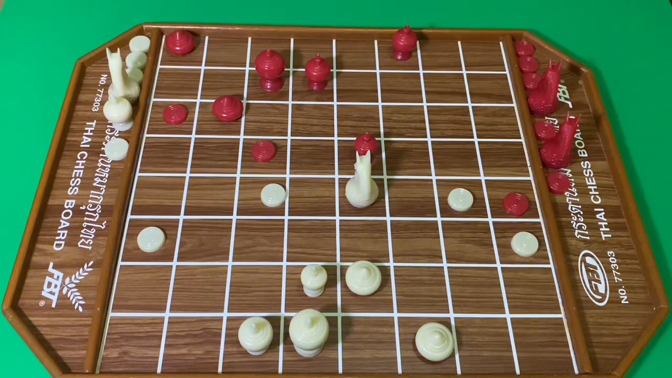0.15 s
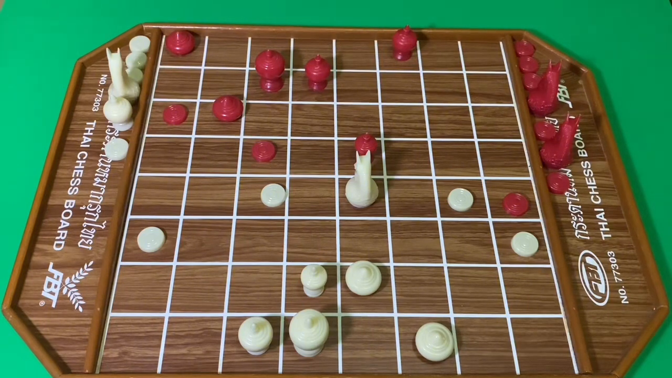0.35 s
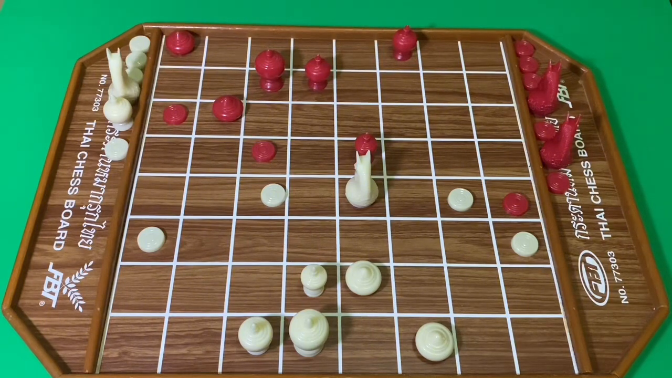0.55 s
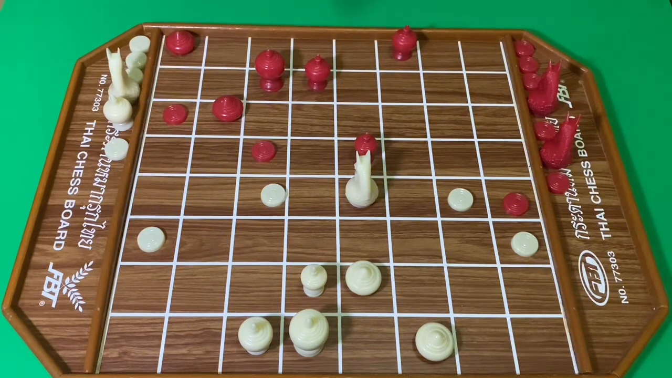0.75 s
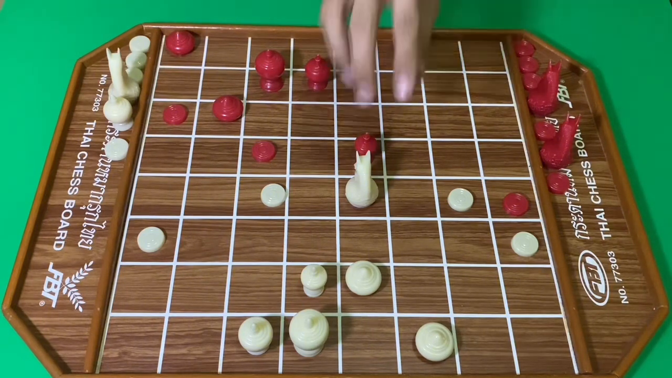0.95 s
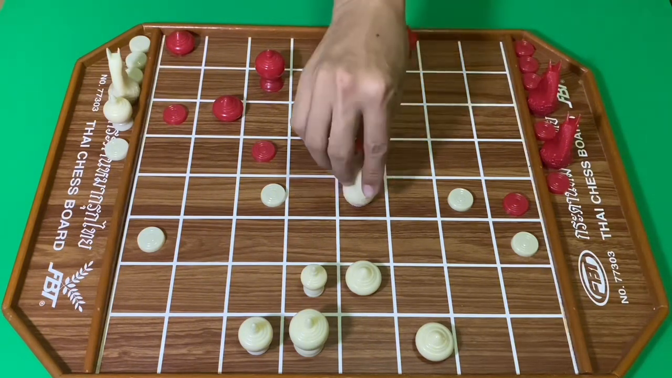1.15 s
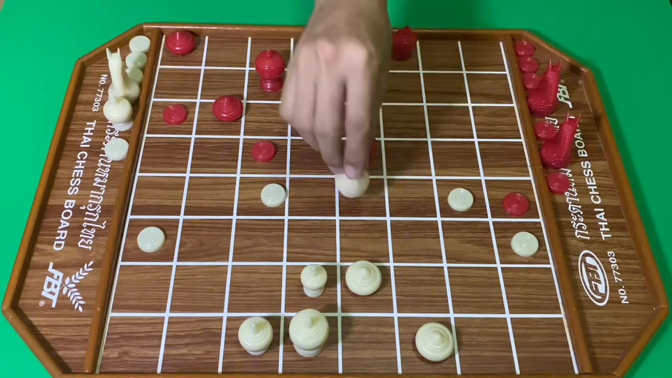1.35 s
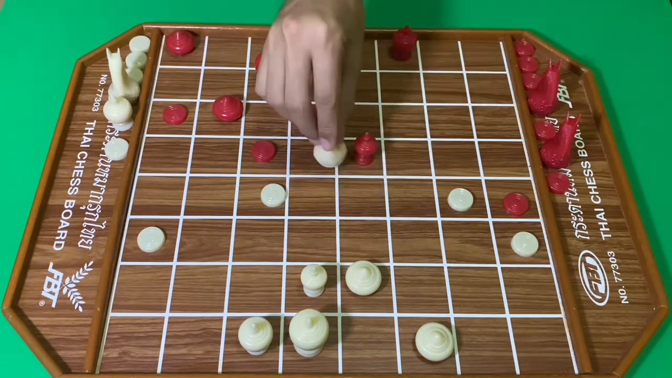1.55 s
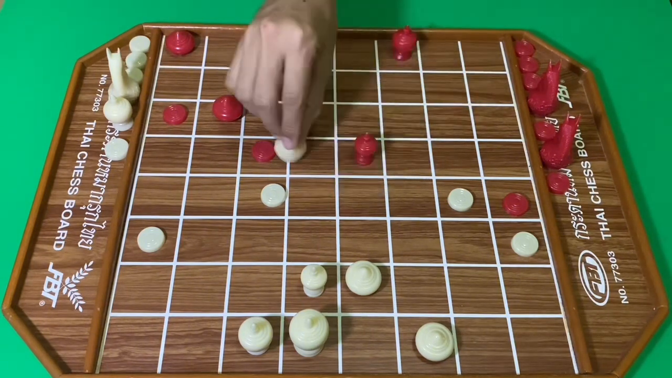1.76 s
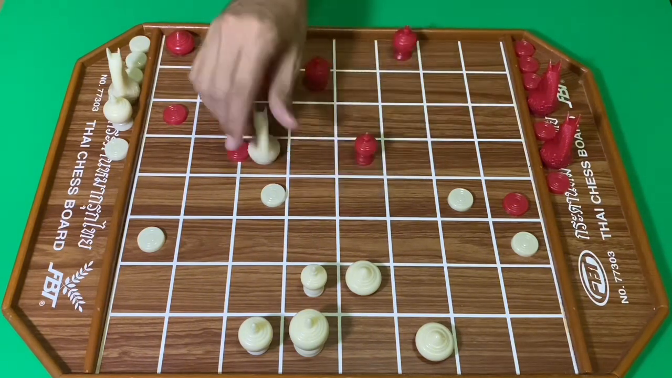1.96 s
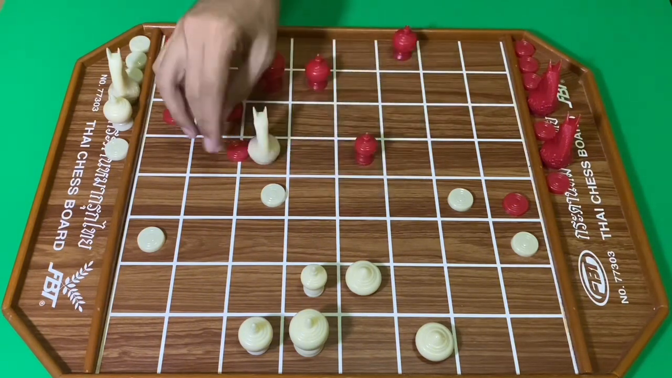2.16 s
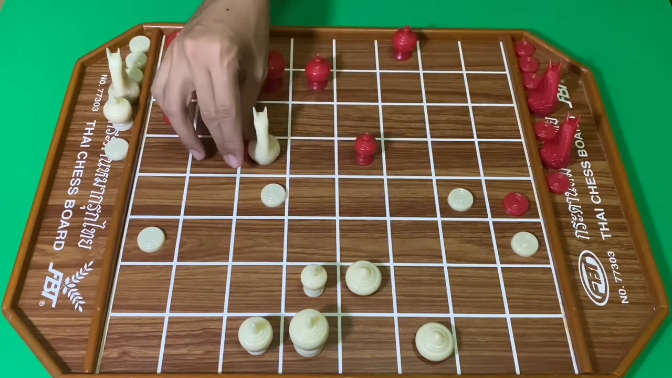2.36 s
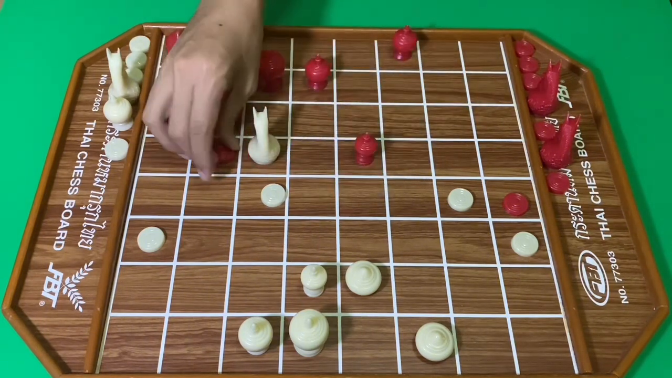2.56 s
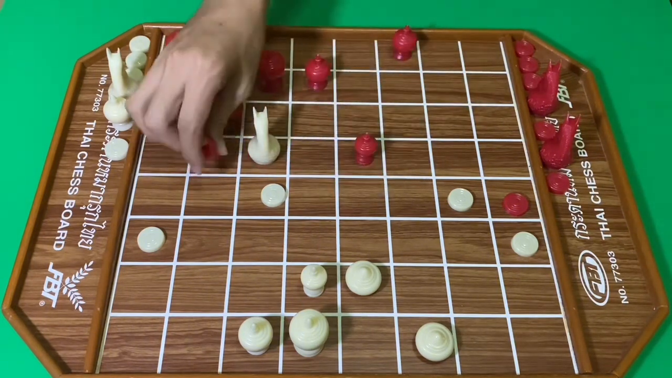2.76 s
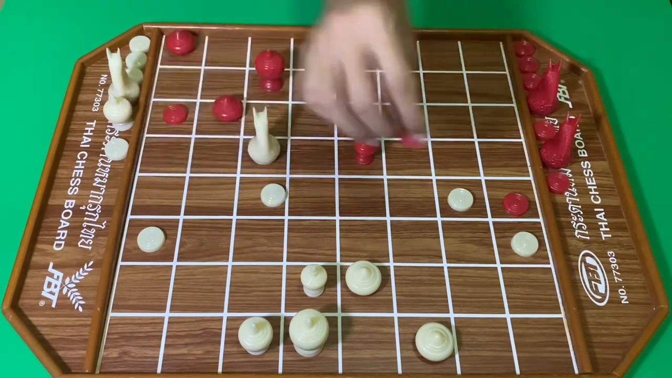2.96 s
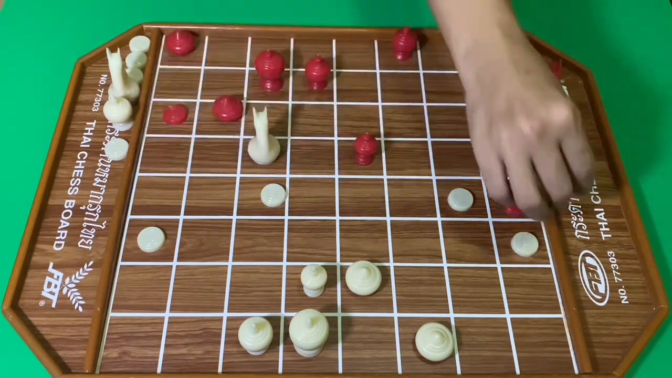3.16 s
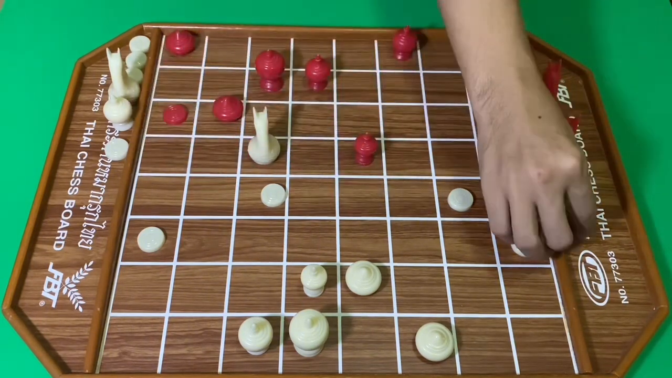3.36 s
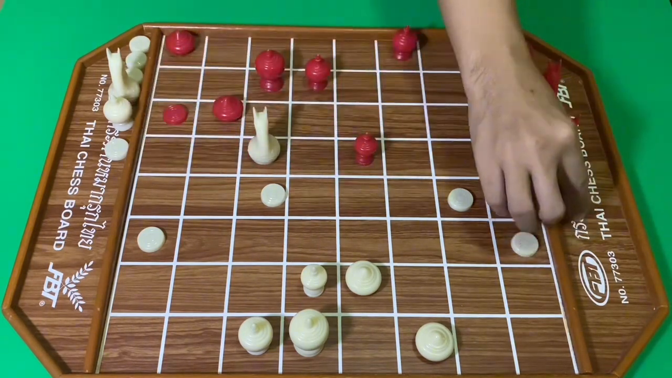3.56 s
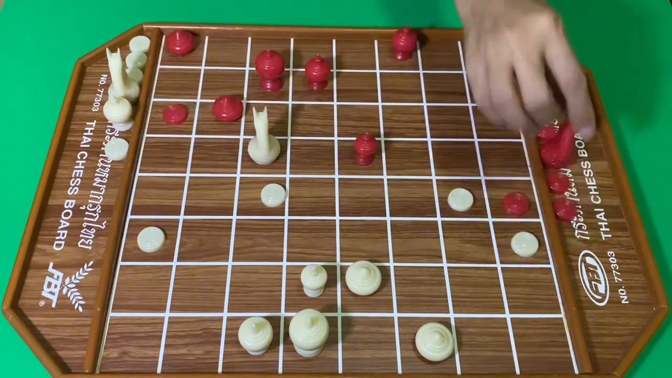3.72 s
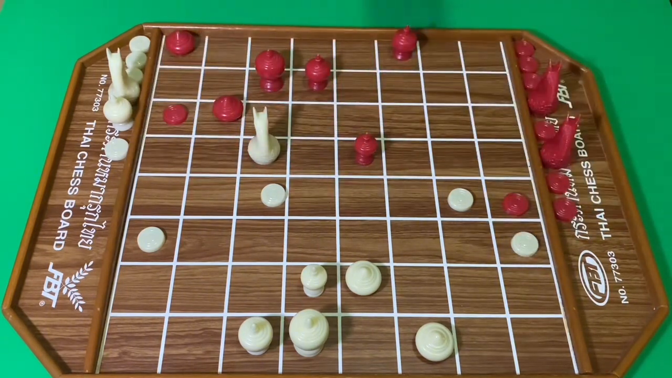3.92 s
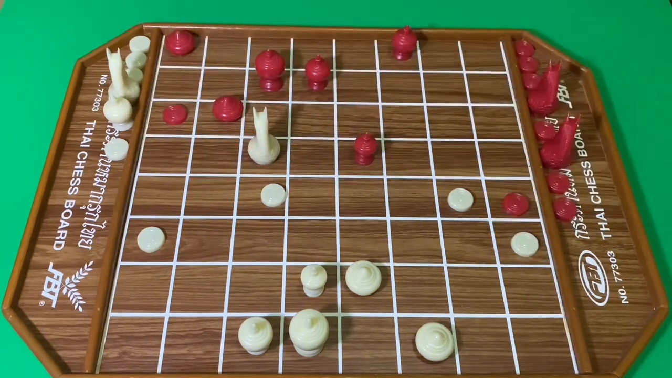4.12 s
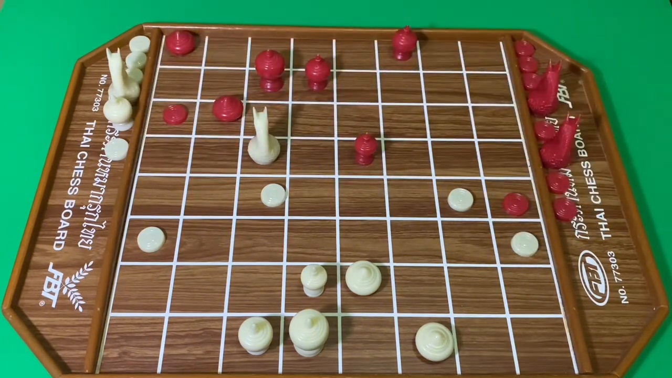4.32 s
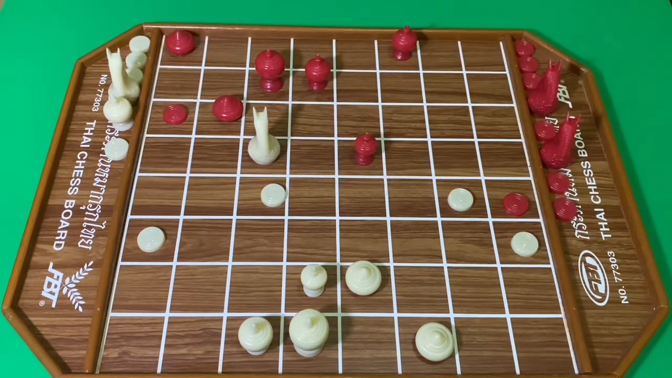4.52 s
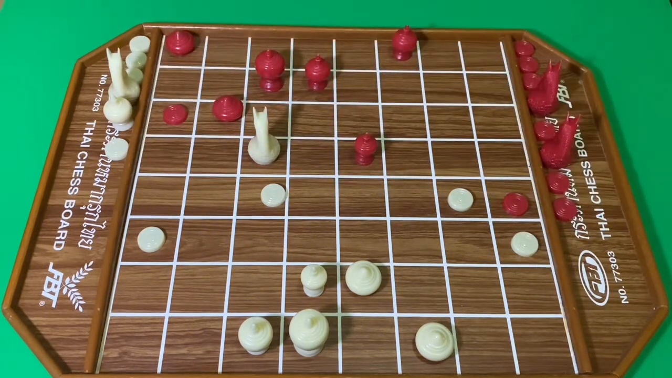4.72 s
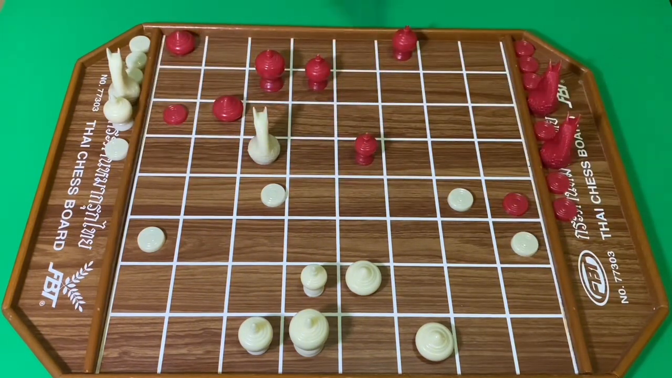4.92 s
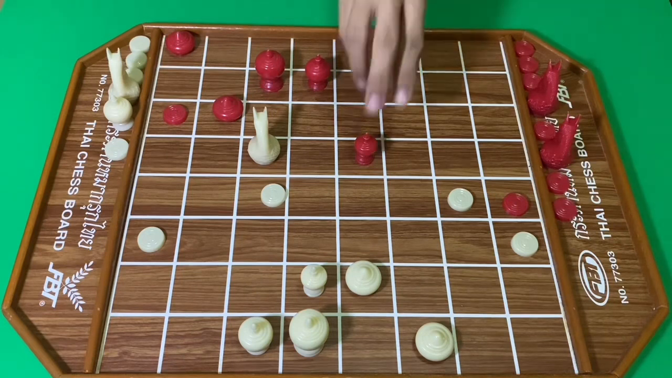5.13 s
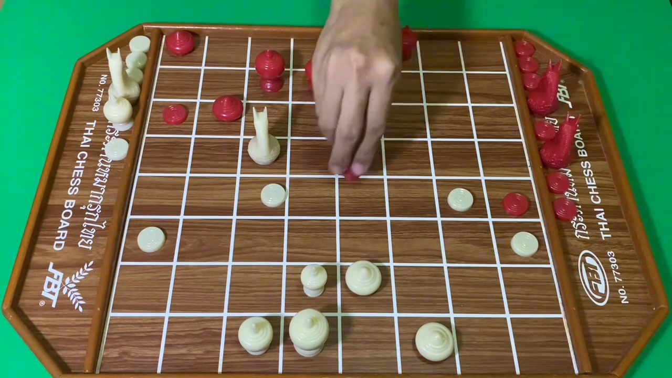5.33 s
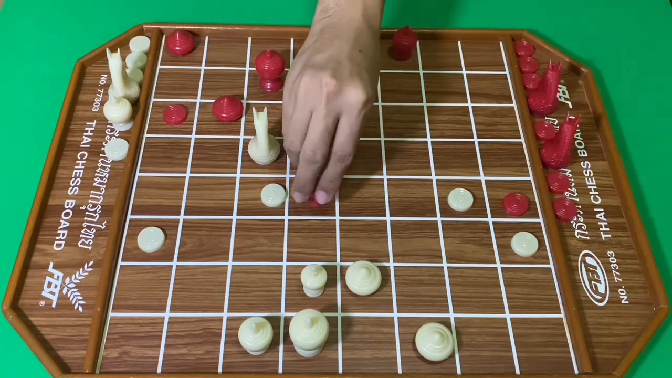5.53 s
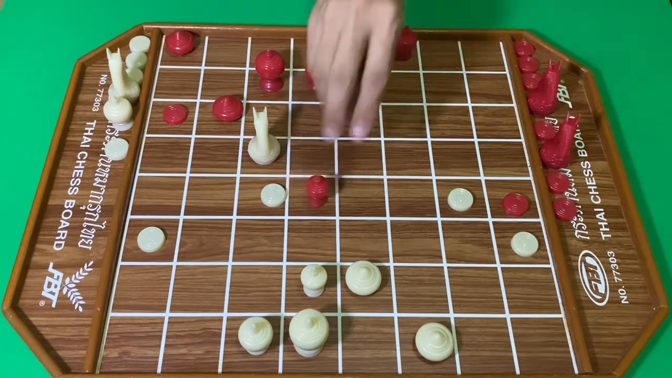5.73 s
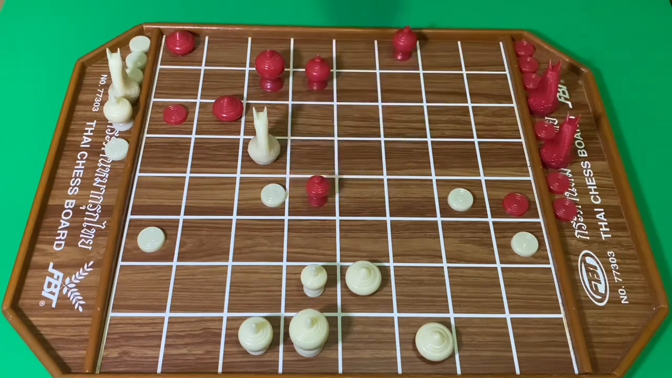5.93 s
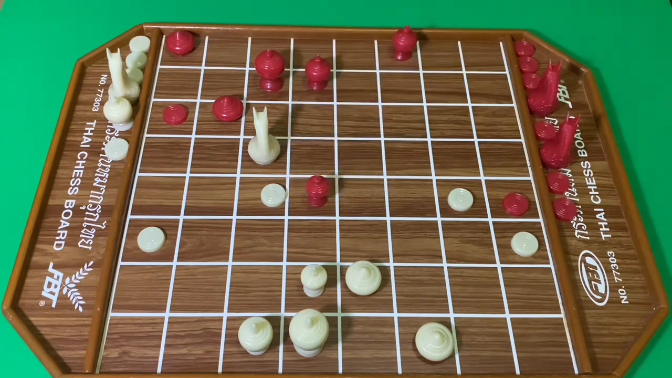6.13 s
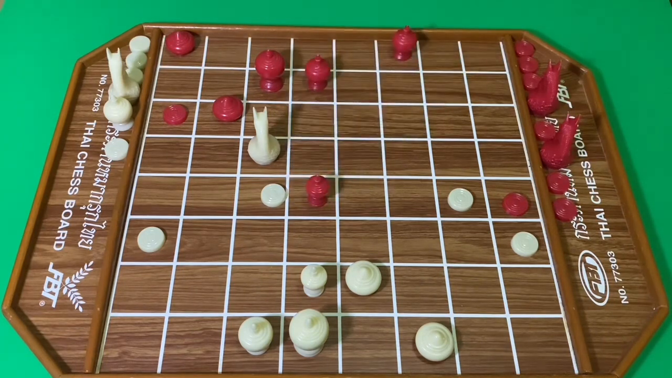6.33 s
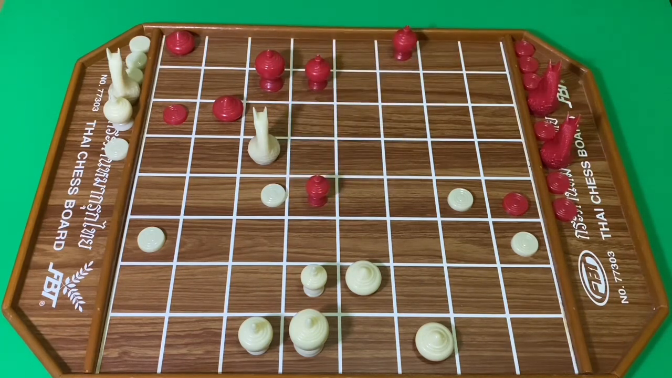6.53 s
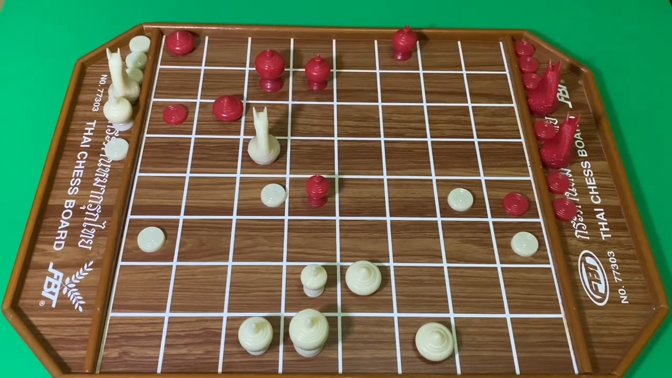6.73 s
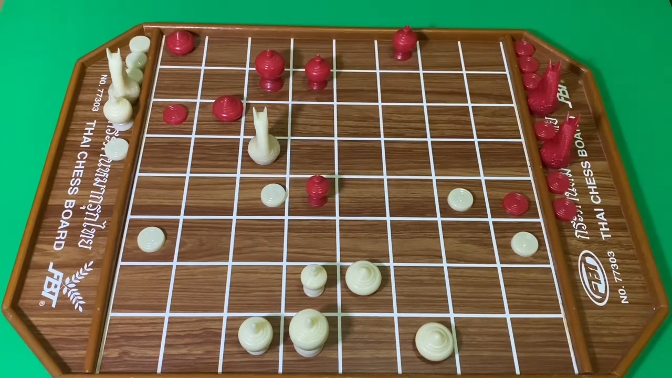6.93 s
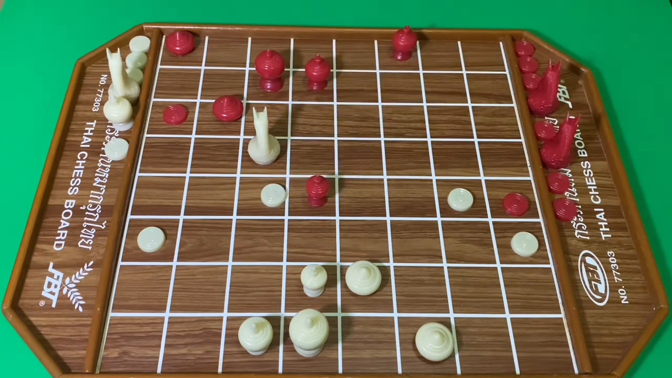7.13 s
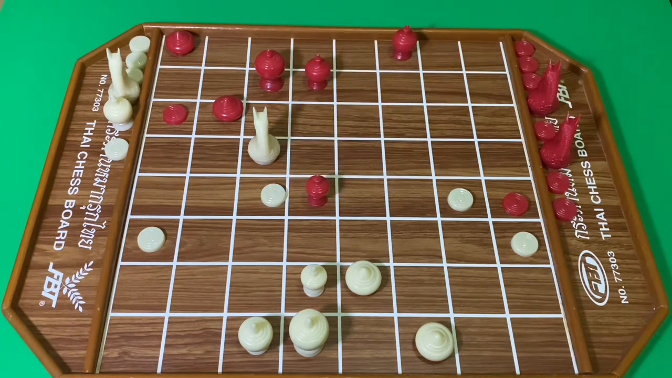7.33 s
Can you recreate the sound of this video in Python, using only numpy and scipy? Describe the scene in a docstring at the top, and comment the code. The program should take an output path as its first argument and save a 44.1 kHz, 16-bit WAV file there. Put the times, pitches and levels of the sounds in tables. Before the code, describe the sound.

In a quiet, bare room with a low wavering hum, faint cloth brushes first. A game piece then knocks loudly on a thin wooden board, followed by small taps and a short scrape. Another piece is lifted with a light rattle, and crisp clicks sound as it joins others at the side. After a pause, a piece drags and chatters softly to a new square. Close stereo microphone, short room echo.

```python
"""A low hum and rumble fill a quiet, bare room; then a sleeve brushes, and a hand moves hard game pieces on a thin board.
The room is shaped noise with hum bands. Cloth is noise in a drifting band; sliding pieces are dense tiny catches
that scrape and make the wood groan. Loose pieces chatter as bursts of quick taps, each burst on one mode, bursts
often overlapping. Each knock rings the board's modes and adds the piece's short crack. Random echoes, a left-right
offset and a microphone colour finish the sound."""
import sys
import numpy as np
from scipy import signal
from scipy.fft import rfft, irfft, next_fast_len
from scipy.io import wavfile
from scipy.ndimage import uniform_filter1d

SR = 44100
rng = np.random.default_rng(int(sys.argv[2]) if len(sys.argv) > 2 else 0)


def put_to_file(sound):
    """Save the sound as 16-bit audio at rate SR, in the file named by the first command-line argument."""
    columns = np.atleast_2d(sound).T  # one column per channel
    safe = np.clip(columns, -1, 1)
    whole_steps = np.round(safe * 32767)
    wavfile.write(sys.argv[1], SR, whole_steps.astype(np.int16))


N = 325458  # length [samples]


def amp(db):
    """Turns dB into a gain."""
    return 10 ** (np.asarray(db) / 20)


def evened(x):
    """Scales a sound to rms 1."""
    return x / np.sqrt(np.mean(x ** 2) + 1e-20)


def read(points, hz):
    """Reads a (frequency, value) table between its points, on a log pitch axis."""
    f, value = np.transpose(points)
    return np.interp(np.log(hz + 1), np.log(f + 1), value)


def add(mix, s, sound):
    """Mixes a sound in at s seconds, cut off at the end of the mix."""
    part = mix[..., round(s * SR):][..., :sound.shape[-1]]
    part += sound[..., :part.shape[-1]]


def coloured(x, points):
    """Filters x by a (frequency [Hz], level [dB]) table."""
    size = next_fast_len(2 * x.shape[-1])
    gain = amp(read(points, np.fft.rfftfreq(size, 1 / SR)))
    return irfft(rfft(x, size) * gain, size)[..., :x.shape[-1]]


def resonate(x, hz, width):
    """A resonance of gain 1: shifts pitch hz, fixed or a curve, down to zero, smooths, and shifts it back."""
    turn = np.exp(2j * np.pi * np.cumsum(hz * np.ones(len(x))) / SR)
    r = np.exp(-np.pi * width / SR)
    smooth = signal.lfilter([1 - r], [1, -r], x / turn)
    return 2 * (turn * smooth).real


# colour of the room noise: (frequency [Hz], relative level [dB])
AIR_COLOUR = [(18, -45.5), (30, -14.5), (49, -8.5), (98, -6.5), (157, -28.5), (196, -21.5), (298, -28),
              (355, -30.5), (930, -38.5), (1080, -42.5), (1190, -45), (2560, -60.5), (11000, -70.5),
              (14300, -100), (22000, -120)]
# how alike left and right are in the room noise: (frequency [Hz], likeness [0 to 1])
AIR_LIKENESS = [(60, 1), (180, 0.7), (550, 0.66), (1650, 0.2), (4970, 0.2), (15000, 0.21)]


def room_noise(hz):
    """Steady hiss and rumble: random spectra, alike left and right in the bass, with soft patches of level."""
    a, b, c, d, patches = rng.standard_normal((N // 512 + 5, 1025, 5)).T
    patches = evened(uniform_filter1d(uniform_filter1d(patches, 10, 0), 8, 1))
    same = read(AIR_LIKENESS, hz)[:, None]
    left = a + 1j * b
    right = same * left + np.sqrt(1 - same ** 2) * (c + 1j * d)
    level_db = read(AIR_COLOUR, hz)[:, None] + 0.42 * patches
    spectra = np.array([left, right]) * amp(level_db)
    noise = signal.istft(spectra, nperseg=2048, noverlap=1536)[1][:, :N]
    return amp(-49.5) * evened(noise)


# hum bands, before the bass swells: (frequency [Hz], width of each of two resonances [Hz], rms level [dB])
HUM_BANDS = [(52.283, 3.8, -50.5), (90.1, 3.3, -56), (121.9, 49, -55), (193.56, 9, -63.5),
             (359.5, 140, -68)]


def hum():
    """Noise through two equal narrow resonances in a row wavers like a hum."""
    out = np.zeros(N)
    for hz, width, db in HUM_BANDS:
        once = resonate(rng.standard_normal(N), hz, width)
        out += amp(db) * evened(resonate(once, hz, width))
    return out


# how the bass swells and sinks; only the distance from each column's mean counts:
# (time [s], level under about 70 Hz [dB], level of about 70-150 Hz [dB])
BASS_SWELLS = [(0.0, -47, -49), (0.18, -55, -54), (1.4, -59.5, -56), (1.72, -60, -53), (2.18, -55.5, -57.5),
               (2.77, -60.5, -55.5), (3.161, -58.5, -52.5), (3.82, -57.5, -56), (4.361, -57, -53),
               (4.52, -49, -51), (4.91, -55.5, -57.5), (5.22, -55.5, -59), (5.49, -56, -51.5),
               (5.79, -58.5, -57.5), (6.191, -56, -52), (6.74, -57, -52.5), (6.97, -58.5, -54.5),
               (7.38, -55.5, -58)]


def air():
    """Room noise and hum, with two bass bands that swell and sink about their means."""
    hz = np.fft.rfftfreq(2048, 1 / SR)
    steady = room_noise(hz) + hum()
    _, t, spectra = signal.stft(steady, SR, nperseg=2048, noverlap=1536)
    s, *levels = np.transpose(BASS_SWELLS)
    low, mid = (np.interp(t, s, db - db.mean()) for db in levels)
    swell_db = np.where(hz[:, None] < 72, low, np.where(hz[:, None] < 155, mid, 0))
    return signal.istft(spectra * amp(swell_db), nperseg=2048, noverlap=1536)[1][:, :N]


FOOT_DB = -21  # a stroke starts and ends this far under its top [dB], with a short taper


def rub(start, swell_s, hold_s, fade_s, db, colour, grit_db, per_s):
    """Rubbing is many tiny catches of uneven size, under a stroke that swells, holds and fades."""
    s = np.cumsum([0, swell_s, hold_s, fade_s])
    t = np.arange(0, s[-1], 1 / SR)
    caught = rng.random(len(t)) < per_s / SR
    size = amp(grit_db * np.minimum(rng.exponential(1, len(t)), 4)) * caught
    grit = evened(coloured(size * rng.standard_normal(len(t)), colour))
    stroke = amp(db + np.interp(t, s, [FOOT_DB, 0, 0, FOOT_DB]))
    return grit * stroke * signal.windows.tukey(len(t), .15)


# cloth brushing as the arm moves: (time [s], swell [s], hold [s], fade [s],
# level of the plain hiss [dB], favoured band from [Hz], to [Hz])
BRUSHES = [(0.41, 0.034, 0.13, 0.06, -74, 1450, 4170), (4.269, 0.0093, 0.015, 0.051, -75.5, 2497, 2630),
           (4.595, 0.085, 0.037, 0.038, -72.5, 2004, 2530), (4.829, 0.0053, 0.011, 0.026, -80, 5000, 5270),
           (6.295, 0.023, 0.0166, 0.053, -82, 3050, 3100)]
# colour of the cloth: (frequency [Hz], relative level [dB])
CLOTH_COLOUR = [(800, -2.5), (1600, -1), (2600, -14), (4000, -10.5), (6000, -13), (10000, -12.5),
                (16000, -26)]


def cloth():
    """Cloth hisses as its threads catch, and a favoured band of the hiss drifts in pitch."""
    out = np.zeros(N)
    for *stroke, from_hz, to_hz in BRUSHES:
        hiss = rub(*stroke, CLOTH_COLOUR, grit_db=4.0, per_s=14000)
        drift_hz = np.geomspace(from_hz, to_hz, len(hiss))
        add(out, stroke[0], hiss + amp(5.5) * resonate(hiss, drift_hz, width=1420))
    return out


BUILD_TURNS = 0.73  # bending waves are slower in the bass: each mode builds up over this many of its own turns


def ring(modes, spread_db):
    """Dying sines, neighbours in opposite sense, the low ones late; the spot that is hit favours some modes."""
    hz, db, t60 = np.transpose(modes)[:, :, None]
    t = np.arange(6000) / SR
    spot_db = spread_db * rng.standard_normal((len(modes), 1))
    sense = (-1) ** np.arange(len(modes))[:, None]
    build = 1 - np.exp(-(t * hz / BUILD_TURNS) ** 2)
    fading = amp(db + spot_db - 60 * t / t60)
    return (sense * build * fading * np.sin(2 * np.pi * hz * t)).sum(0)


SPOT_S = .025  # a sliding piece reaches a new spot this often [s]
# pieces dragged over the board: (time [s], swell [s], hold [s], fade [s],
# scrape level [dB], groan level [dB], groan from [Hz], to [Hz])
DRAGS = [(1.817, 0.021, 0.049, 0.047, -61.5, -55.5, 1000, 885),
         (1.908, 0.011, .01, 0.062, -85.5, -65, 896, 1100),
         (2.326, 0.0068, 0.0082, 0.042, -85, -77, 1310, 1250),
         (2.375, 0.067, 0.02, 0.12, -64.5, -81, 1682, 1477),
         (2.603, 0.042, 0.0094, 0.016, -57.5, -56, 3450, 1600),
         (3.331, 0.1, 0.02, 0.022, -70, -58.5, 1943, 2606),
         (5.284, 0.0268, 0.12, 0.051, -57, -54.5, 2170, 990),
         (5.43, 0.0262, 0.041, 0.071, -64, -58, 1500, 1290)]
# spectrum of the hiss in the scrape layer, with a narrow band near 14.6 kHz:
# (frequency [Hz], relative level [dB])
SCRAPE_HISS = [(500, -18), (1500, -2), (2500, -4), (3500, -7), (5000, -5.5), (7500, -14), (9500, -18),
               (10700, -12), (12500, -14), (14600, 1), (16000, -20)]


def slides():
    """Sliding pieces scrape, and ring board and piece modes within a wide band that glides."""
    out = np.zeros(N)
    modes = [(hz, 0, .008) for hz, _, _ in BOARD_MODES + PIECE_MODES]  # the hand damps the board
    rough_colour = [(300, -5), (700, 1), (2000, -5), (5000, -9.5), (7000, -16)]  # (Hz, dB)
    for *stroke, scrape_db, groan_db, from_hz, to_hz in DRAGS:
        scrape = rub(*stroke, scrape_db, SCRAPE_HISS, grit_db=2.0, per_s=8000)
        rough = rub(*stroke, groan_db, rough_colour, grit_db=2.2, per_s=3000)
        spot = np.arange(len(rough)) // round(SPOT_S * SR)
        wood = np.zeros(len(rough))
        for k in range(spot[-1] + 1):  # each new spot favours other modes
            wood += signal.fftconvolve(rough * (spot == k), ring(modes, spread_db=3.5))[:len(rough)]
        groan = resonate(wood, np.linspace(from_hz, to_hz, len(rough)), width=1800)
        add(out, stroke[0], scrape + groan * np.std(rough) / np.std(groan))
    return out


# a loose piece chatters in the fingers or on the board, each row on one mode, rows often overlapping:
# (time [s], length [s], mode frequency [Hz], level before swell and mix [dB])
CHATTERS = [(2.312, .025, 2800, -68), (2.375, .035, 1800, -68), (2.44, .04, 5400, -70),
            (2.46, .025, 1900, -66), (2.47, .025, 4300, -68), (2.605, 0.035, 3000, -72),
            (2.622, .016, 2400, -62), (2.629, 0.019, 3100, -57), (2.628, 0.019, 5150, -61),
            (2.636, .016, 2100, -61.5), (2.643, 0.022, 1700, -51.5), (2.646, 0.016, 5160, -56),
            (2.649, 0.0112, 3300, -59), (2.651, .012, 6830, -60), (2.66, 0.013, 4000, -63),
            (3.449, 0.017, 2610, -55.5), (5.425, .07, 4800, -65.5), (5.318, .085, 1850, -58),
            (5.33, .09, 2540, -65), (5.335, 0.044, 900, -56), (5.371, .085, 1150, -51),
            (5.444, .07, 1850, -57), (5.461, 0.067, 1250, -59.5), (5.5, 0.053, 2100, -67)]


def chatter():
    """Bursts of quick uneven taps, each ringing one short mode under a rounded swell."""
    out = np.zeros(N)
    for s, length, hz, db in CHATTERS:
        count = round(length * SR) + 8
        size = amp(3.0 * np.minimum(rng.exponential(1, 4000), 2.5))
        tapped = rng.random(4000) < 1500 / SR  # about 1500 taps a second
        taps = size * rng.choice([-1, 1], 4000) * tapped
        narrow = resonate(taps, hz, 60 + .1 * hz)
        tone = resonate(narrow, hz, 300 + .15 * hz)[:count]
        add(out, s, amp(db) * evened(tone) * np.hanning(count))
    return out


BLOW_SPREAD_DB = 1.5  # how much the place of a blow changes each mode [dB]
BEND_S = .07  # bending waves arrive about this many s / sqrt(Hz) late: treble first, bass after
# modes of the hard hollow piece: (frequency [Hz], relative level [dB], time to fall by 60 dB [s])
PIECE_MODES = [(780, 25, .007), (1250, 28, 0.007), (1619, 26.5, 0.008), (2157.9, 28, 0.0059),
               (2667, 25.5, 0.0034), (3300, 26.5, 0.007), (3778, 23.5, 0.0072), (4413, 25, 0.0068),
               (5035, 25.5, 0.0047), (5830, 26.5, 0.005), (6730, 26, 0.0025), (9180, 27.5, 0.0016),
               (12500, 26.5, 0.0015), (15000, 24, 0.0018)]


def crack(levels_db, smear_s):
    """One snap through the short modes of the piece; its bands arrive a little scattered."""
    hz = np.fft.rfftfreq(4096, 1 / SR)
    f, db, t60 = np.transpose(PIECE_MODES)[:, :, None]
    strength = amp(db + BLOW_SPREAD_DB * rng.standard_normal((len(f), 1)))
    sense = (-1) ** np.arange(len(f))[:, None]
    body = (strength * sense / (1 + 2j * np.pi * (hz - f) * t60 / np.log(1000))).sum(0)
    scatter = evened(uniform_filter1d(rng.standard_normal(len(hz)), size=30)) ** 2
    late = BEND_S / np.sqrt(hz + 300) + smear_s * scatter
    delay = np.exp(-2j * np.pi * np.cumsum(late) * hz[1])  # summed lateness gives the phase
    click_db = read(list(zip((800, 1600, 3200, 5500, 10000), levels_db)), hz)
    bass_cut = np.minimum(hz / 600, 1) ** 3
    snap = irfft(body * amp(click_db) * bass_cut * delay)
    return snap * signal.windows.tukey(4096, .02) * (np.arange(4096) < 2048)


def peaked(x):
    """Scales a sound so that its first 8 ms have rms 1."""
    return x / np.sqrt(np.mean(x[:350] ** 2))


# every knock: (time [s], board level [dB], relative piece click level near 0.8, 1.6, 3.2, 5.5 and 10 kHz
# [dB, five columns], contact time [ms])
BLOWS = [(1.19, -59.5, -79, -90, -90, -100, -99, 2.5), (1.6447, -17.5, -9, -9, -19.5, -25.5, -43.5, 1),
         (1.796, -48, -60, -71, -72, -75, -85, 2.5), (1.806, -38, -38, -45, -38.5, -36, -50, 0.27),
         (1.910, -45, -39, -61.5, -41.5, -45.5, -69, 0.92),
         (1.922, -51.5, -54.5, -59.5, -65, -65, -80, 0.8), (2.11, -82.5, -72.5, -67, -70.5, -75, -77, 0.68),
         (2.317, -67, -55, -60, -62, -62, -80, 1.3), (2.655, -73, -49, -46, -65, -65, -61, 0.83),
         (2.689, -57.5, -37, -37.5, -46.5, -73, -88, 1.9),
         (3.2818, -60, -37.5, -31.5, -35.5, -54, -67, 0.458),
         (3.283, -44, -24.5, -24, -45.5, -58.5, -66.5, 0.49),
         (3.3144, -49, -29, -33.5, -34, -47, -69, 0.93), (3.316, -58, -32, -33.5, -44, -49.5, -74.5, 0.7),
         (3.433, -66, -67, -60, -49, -59.5, -85, 0.5), (3.451, -69.5, -56, -50.5, -51, -58.5, -84, 0.5),
         (3.458, -60, -38, -30, -38, -50, -75.5, 0.36), (3.464, -40, -20, -26.5, -25.5, -23.5, -27.5, 0.24),
         (3.4667, -48.5, -26.5, -31.5, -32.5, -33, -34, .4),
         (3.471, -51, -37.5, -35, -38.5, -38, -46.5, 0.43), (5.298, -54, -54, -41, -49.5, -84, -58, 0.49),
         (5.348, -55.5, -38, -42, -55, -75, -59, 0.578), (5.382, -50, -60, -59, -70, -75, -80, 1.008),
         (5.454, -53.5, -60, -48, -60, -70, -80, .6), (5.551, -52, -46, -65, -80, -90, -95, 1.56),
         (5.605, -51, -45, -50, -84, -97, -99, 1.039), (5.612, -73, -74, -74, -90, -95, -97.5, 1.1),
         (5.643, -58, -72, -82, -90, -97, -96, 2.3), (5.679, -59, -62, -80, -90, -100, -98.5, 2.3)]
# modes of the thin wooden board: (frequency [Hz], relative level [dB], time to fall by 60 dB [s])
BOARD_MODES = [(130.5, -17, 0.13), (197, -14, 0.032), (256, -4, 0.055), (312, 1, 0.027), (351, 2, 0.032),
               (395.6, -7.5, 0.03), (443, -11.5, .03), (494.4, -7.5, 0.06), (560, -12.5, 0.09),
               (634, -9.5, 0.034), (712.5, -7.5, 0.039), (766.3, -3.5, 0.032), (909, -7, 0.03),
               (1090, -6, 0.026), (1201, -3, 0.014), (1355, -12, 0.036), (1500, -10.5, 0.04),
               (1843, -12, 0.064), (2060, -15.5, 0.033), (2400, -15.5, 0.032)]


def knocks():
    """A contact pulse rings the board; long contacts leave the high modes quiet. The piece cracks on top."""
    out, t = np.zeros(N), np.arange(4096) / SR
    rise = 1 - np.exp(-(t / 0.00025) ** 2)  # the base lands edge first
    for s, board_db, *click_db, contact_ms in BLOWS:
        push_s = contact_ms / 6000 + 1e-5  # the push peaks after a sixth of the contact
        push = t[:400] * np.exp(-t[:400] / push_s)
        rung = signal.fftconvolve(ring(BOARD_MODES, BLOW_SPREAD_DB), push)[:4096]
        board = amp(board_db) * peaked(rung * rise)
        add(out, s, board + crack(click_db, smear_s=0.0004))
    return out


# how long the room rings: (frequency [Hz], time to fall by 60 dB [s])
ECHO_TIMES = [(200, 0.061), (530, .25), (1400, .3), (3700, 0.3668), (9700, 0.32)]
# how alike left and right are in the echo: (frequency [Hz], likeness [0 to 1])
ECHO_LIKENESS = [(200, 1), (600, 0.26), (1500, 0.38), (5000, 0.6), (9000, 0.6)]


def room(x):
    """Sparse taps of random sign, each band dying at its own speed; the walls answer after some ms."""
    taps = np.zeros((2, SR // 2))
    at = np.arange(0, SR // 2 - 20, 10)
    at = at + rng.integers(0, 10, (2, len(at)))
    np.put_along_axis(taps, at, rng.choice([-1., 1.], at.shape), 1)
    hz, t, z = signal.stft(taps, SR, nperseg=256)
    same = read(ECHO_LIKENESS, hz)[:, None]
    z = np.array([z[0], same * z[0] + np.sqrt(1 - same ** 2) * z[1]])
    dying = amp(-60 * t / read(ECHO_TIMES, hz)[:, None])
    tail = signal.istft(z * dying, SR, nperseg=256)[1]
    tail *= np.clip((np.arange(tail.shape[1]) / SR - .002) / 0.0015, 0, 1)  # silent for 2 ms, full at 3.5 ms
    return signal.fftconvolve(x[None], tail / np.linalg.norm(tail[0]), axes=1)[:, :N]


def scene():
    """Near sounds with their room, over the air; moving sounds swing back and forth between two sets of echoes."""
    loose = chatter()
    moving = cloth() + slides() + amp(-5.0) * loose
    hits = knocks()
    turn = np.pi * 9.0 * np.arange(N) / SR  # 4.5 swings a second
    echo = room(hits + moving * np.cos(turn)) + room(moving * np.sin(turn))
    # a second share of the chatter stays free of echo
    return hits + moving + amp(-7.0) * loose + amp(-1.0) * echo + air()


# phase by which left leads right: (frequency [Hz], lead [radians])
LEFT_LEAD = [(100, 0), (3000, 0.91), (7000, 1.3), (8400, -2), (11500, -0.5), (16000, -1)]
# level of left minus right: (frequency [Hz], level [dB])
LEFT_LOUDER = [(100, 1.5), (4000, 3), (9000, 0.87)]


def left_right_offset(x):
    """Gives the right channel a phase offset and a level that change with pitch."""
    hz = np.fft.rfftfreq(x.shape[1], 1 / SR)
    turn = np.exp(-1j * read(LEFT_LEAD, hz)) * amp(-read(LEFT_LOUDER, hz))
    return np.array([x[0], irfft(rfft(x[1]) * turn, x.shape[1])])


# colour of the microphone: (frequency [Hz], level [dB])
MIC_COLOUR = [(25, -16), (35, -16), (42, -2), (7000, 1.5), (8000, -2.5), (8400, -4.5), (8800, 1.5),
              (11000, 3.5), (11800, -23), (14500, -21), (16000, -24)]


def record(dry):
    """Left-right offset, microphone colour, band limit; mirrored ends keep the filters from clicking."""
    after = next_fast_len(N + 8192) - N - 4096
    long = np.pad(dry, ((0, 0), (4096, after)), "reflect")
    heard = coloured(left_right_offset(long), MIC_COLOUR)
    low_pass = signal.firwin(511, 16480, window=("kaiser", 9), fs=SR)  # edge at 16480 Hz
    return signal.oaconvolve(heard, low_pass[None], "same")[:, 4096:][:, :N]


dry = scene()
out = record(dry)
put_to_file(out)
```